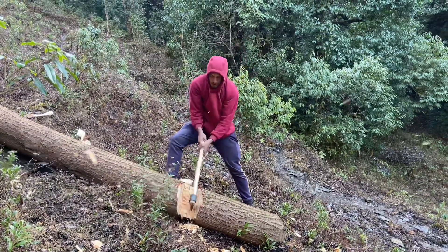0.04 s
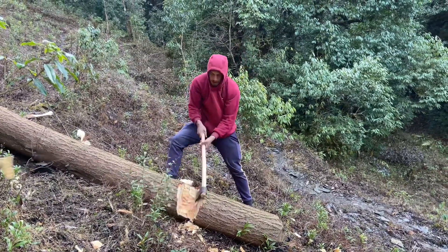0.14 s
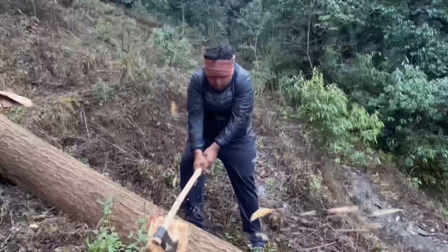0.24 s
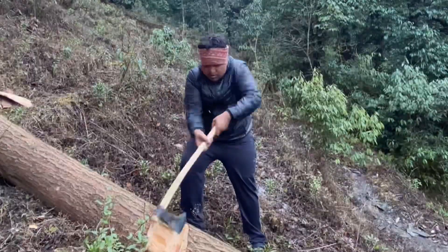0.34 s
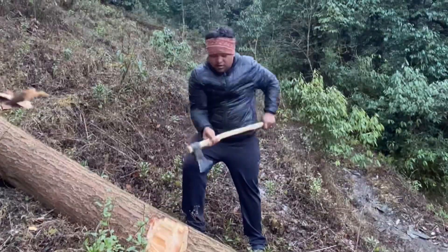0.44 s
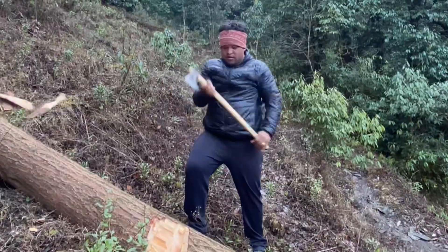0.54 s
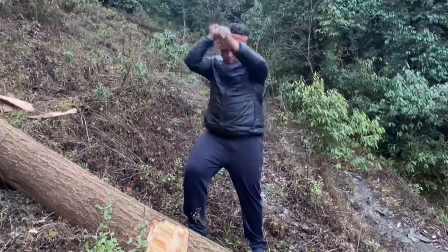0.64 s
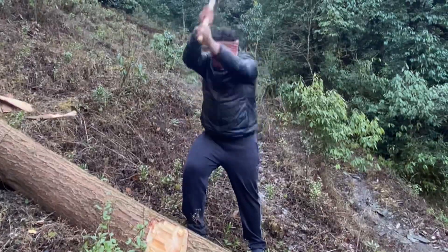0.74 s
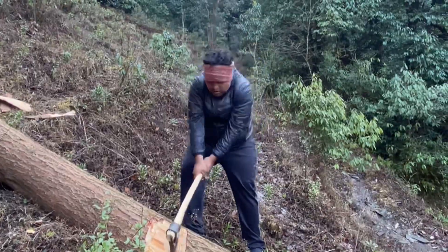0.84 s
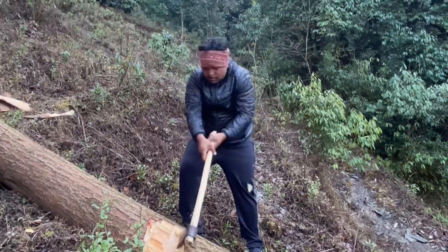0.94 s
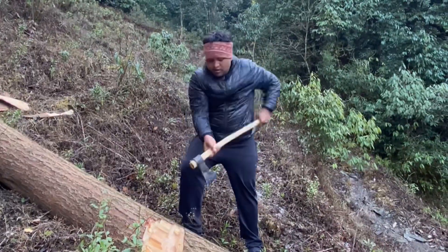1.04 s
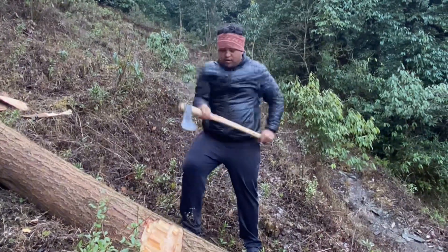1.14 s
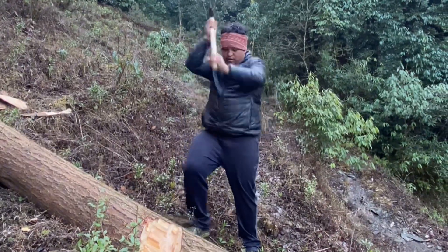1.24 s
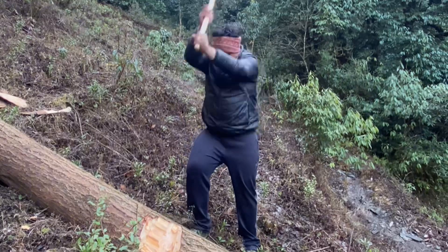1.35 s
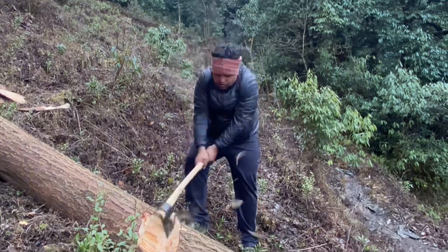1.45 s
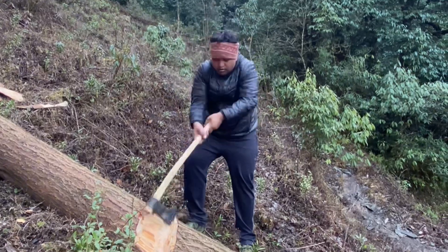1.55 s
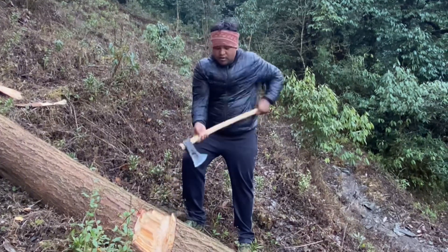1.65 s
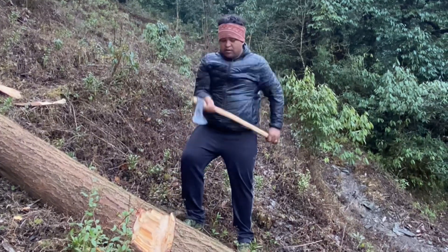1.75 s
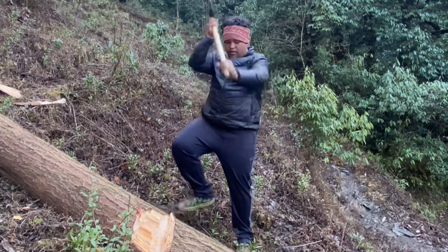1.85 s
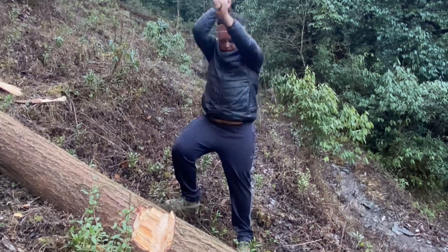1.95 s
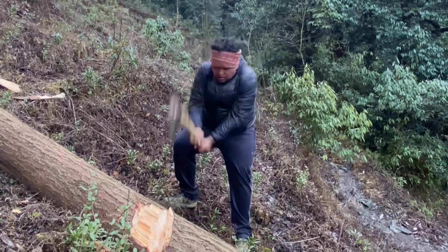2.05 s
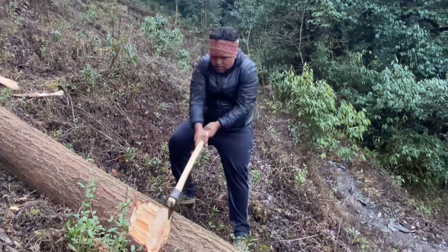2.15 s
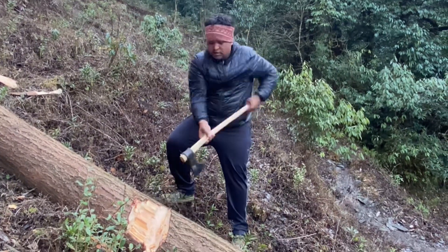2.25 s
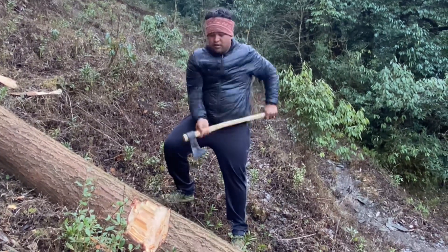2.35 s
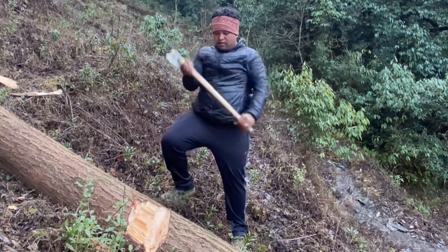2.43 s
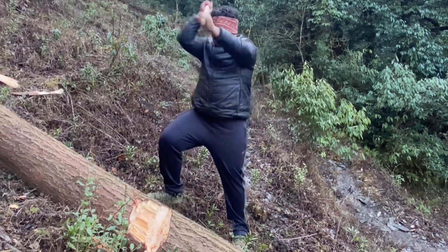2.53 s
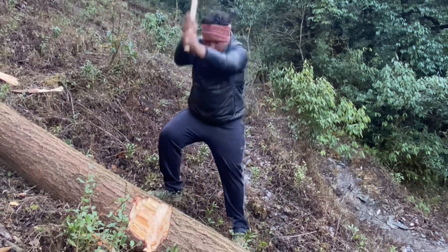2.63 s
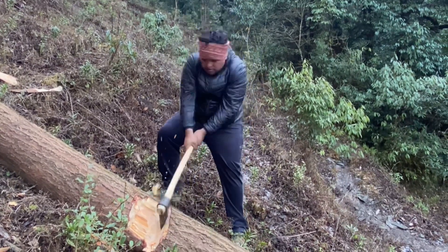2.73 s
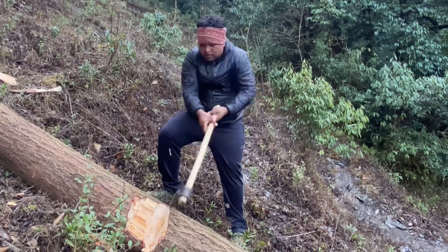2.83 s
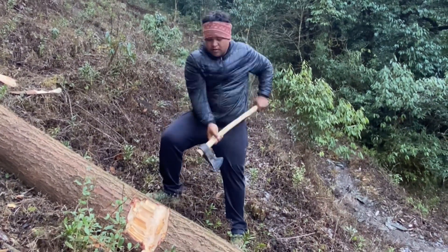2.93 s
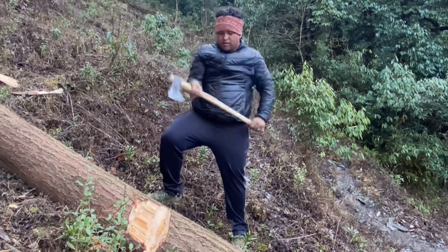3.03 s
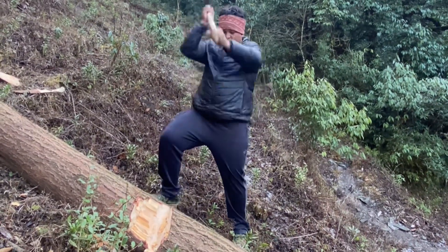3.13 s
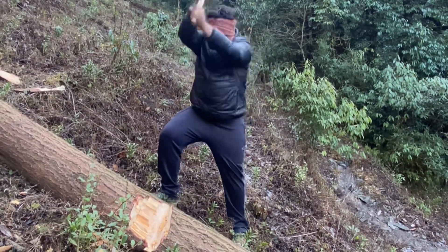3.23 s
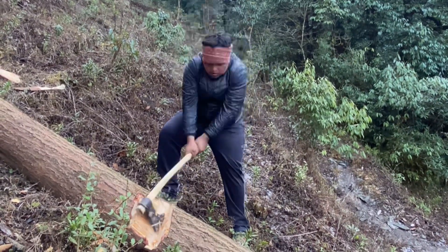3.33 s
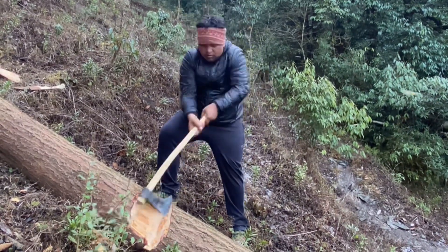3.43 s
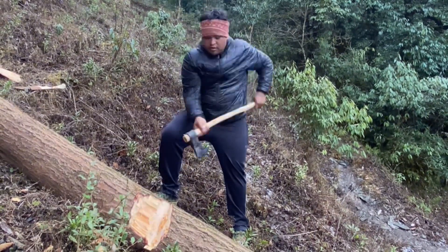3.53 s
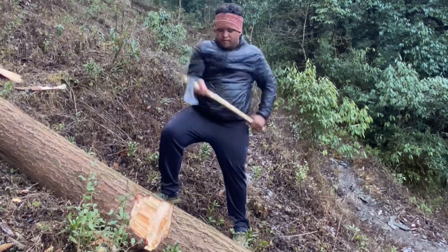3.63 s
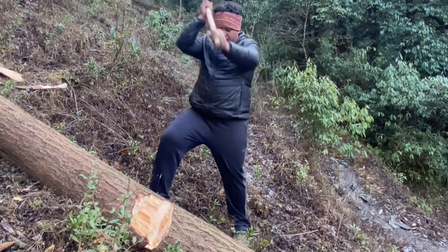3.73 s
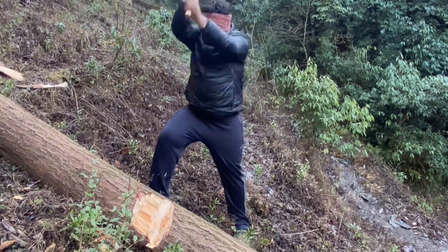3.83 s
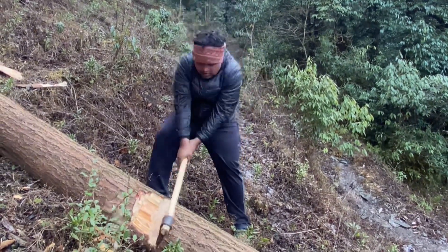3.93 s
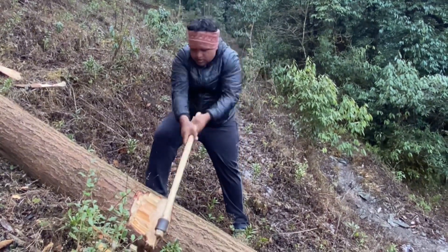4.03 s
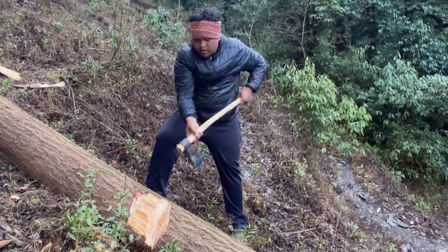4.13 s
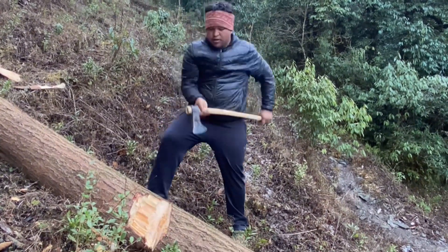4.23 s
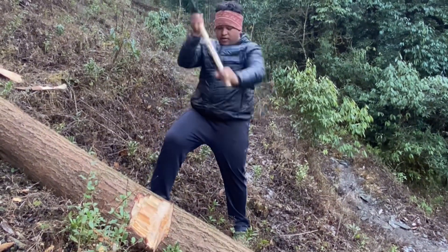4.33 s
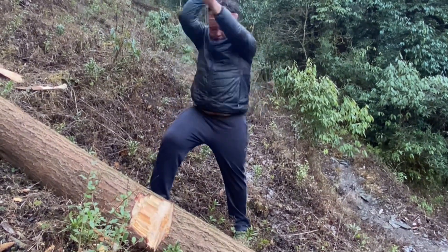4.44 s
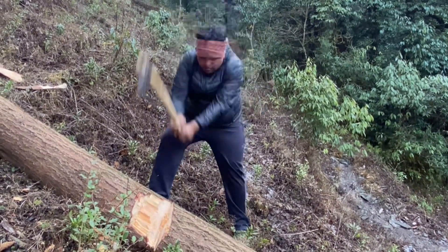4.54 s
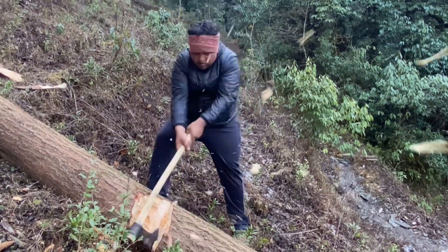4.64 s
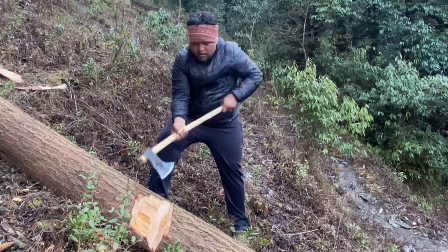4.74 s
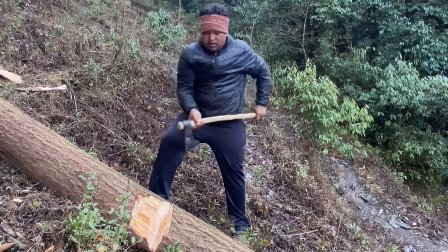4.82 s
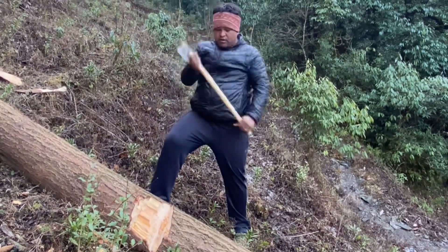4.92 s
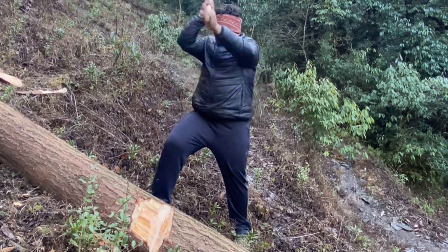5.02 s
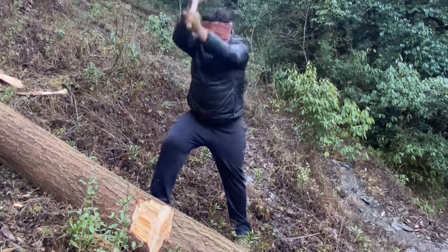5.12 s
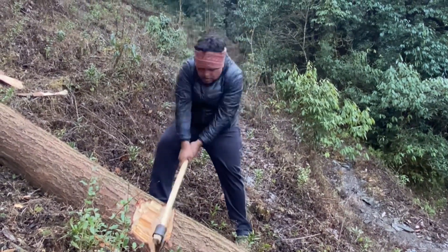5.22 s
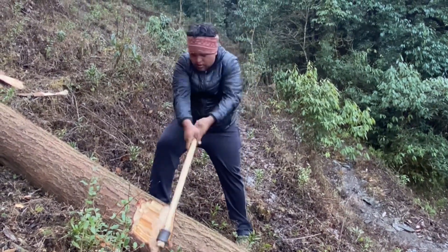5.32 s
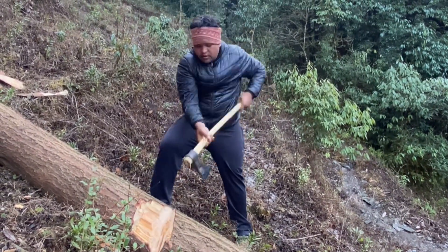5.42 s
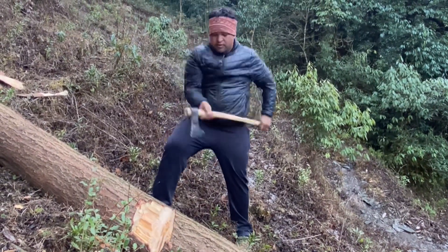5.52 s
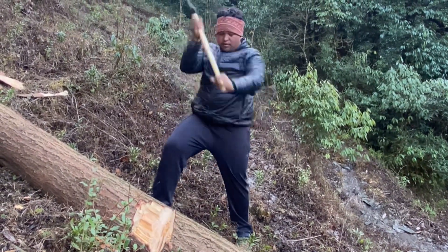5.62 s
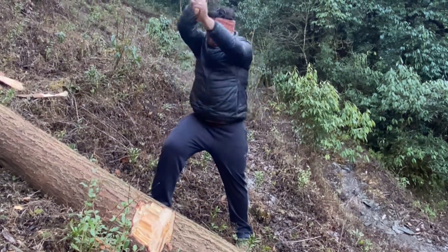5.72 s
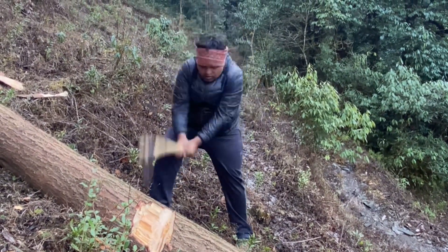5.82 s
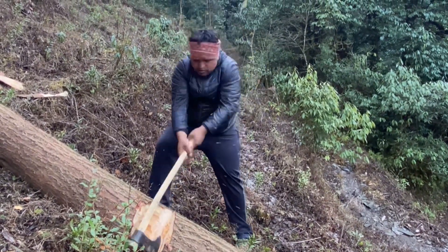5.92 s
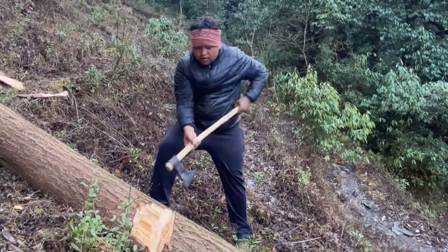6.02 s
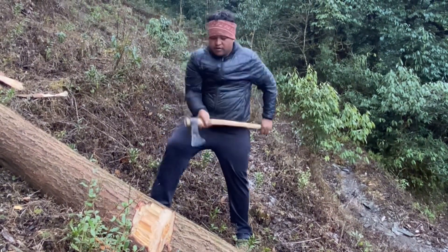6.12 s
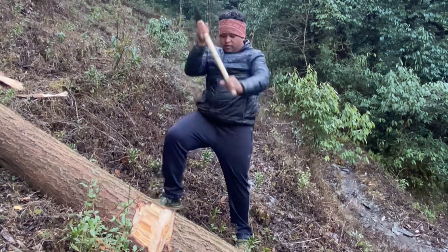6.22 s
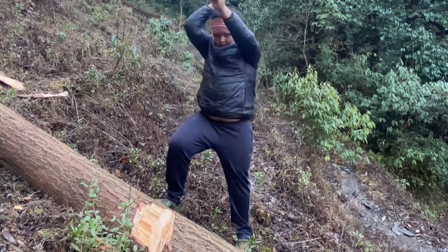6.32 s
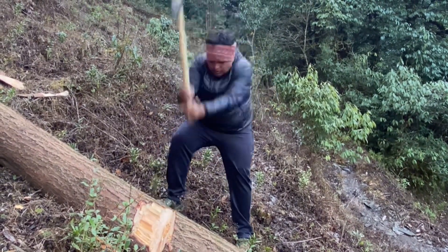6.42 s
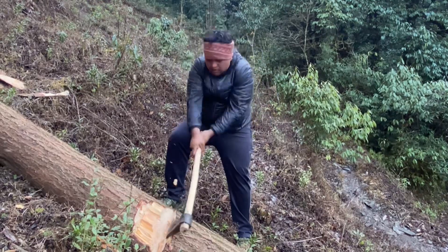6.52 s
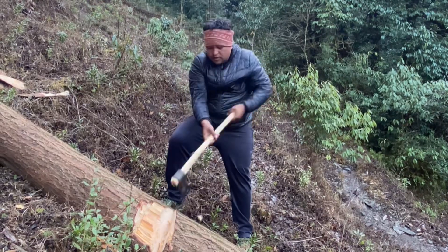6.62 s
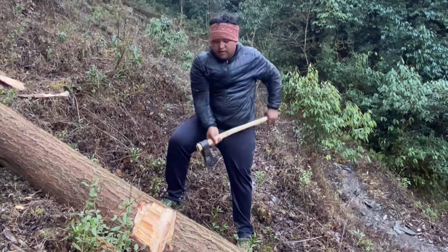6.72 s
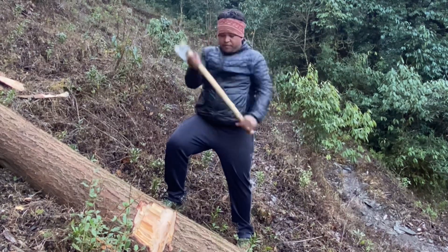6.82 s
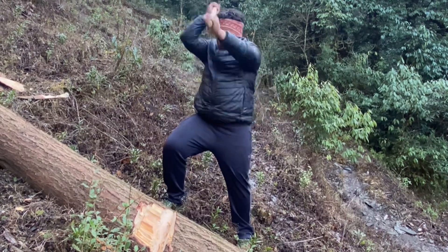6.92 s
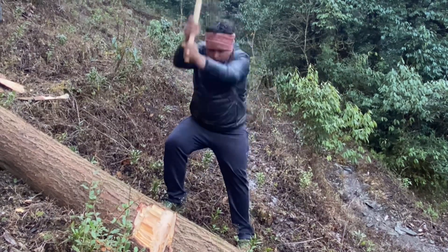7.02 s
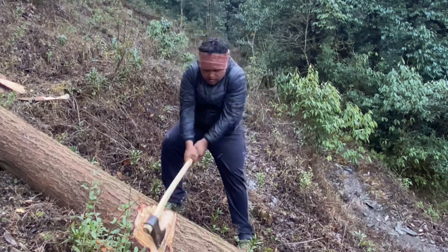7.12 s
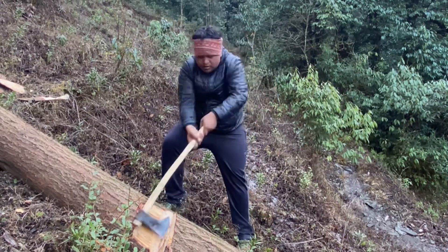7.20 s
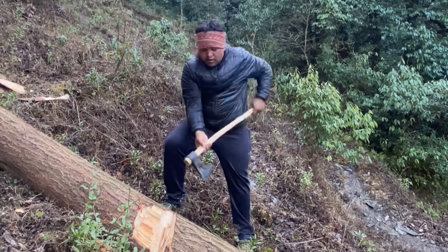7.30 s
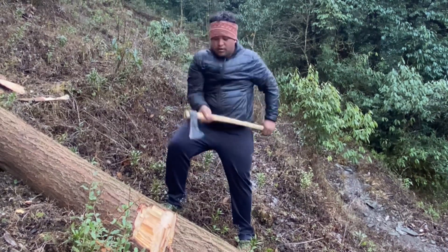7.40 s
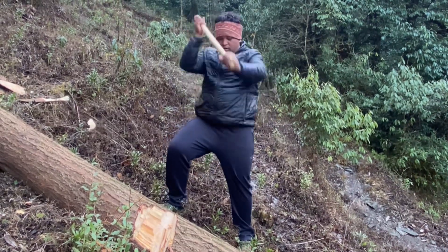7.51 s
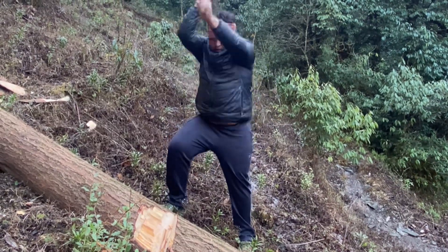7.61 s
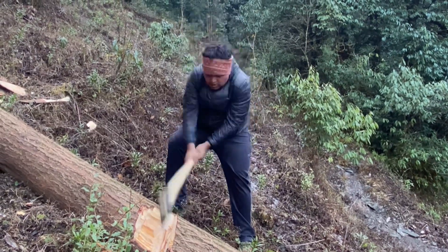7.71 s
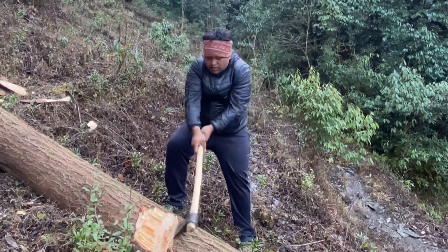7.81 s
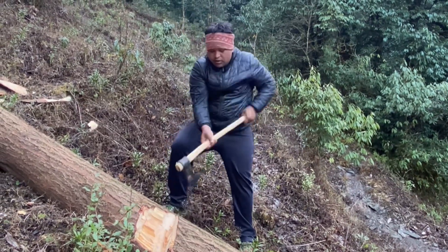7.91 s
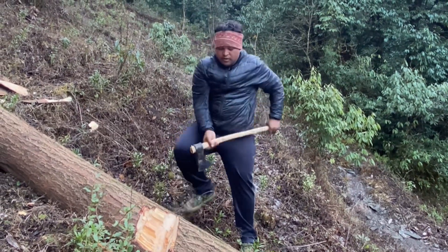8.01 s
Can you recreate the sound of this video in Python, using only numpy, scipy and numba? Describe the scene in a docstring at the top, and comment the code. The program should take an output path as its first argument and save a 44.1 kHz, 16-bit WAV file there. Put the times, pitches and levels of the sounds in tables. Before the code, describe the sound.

After a short low rumble breaks off, loud woody axe blows thump and splinter while sharper knocks on other timber fill the gaps.

```python
"""Axe work on a wooded slope

An axe chops a notch into a felled trunk while lighter, quicker blows fall on other timber.
Bursts of tiny fibre breaks ring the wood in each blow; then a damped thump and the log's hum follow.
Filtered noise makes the soft forest hiss, jacket swishes, crumbs and twig snaps; thuds reuse the thump.
A wavering rumble under hiss opens the scene and breaks off; a limiter lowers the loudest moments."""
import sys
import numpy as np
from scipy import signal
from scipy.fft import rfft, irfft, next_fast_len
from scipy.io import wavfile
from scipy.ndimage import uniform_filter1d, minimum_filter1d
from numba import njit

SR = 44100
rng = np.random.default_rng(int(sys.argv[2]) if len(sys.argv) > 2 else 0)


def int16_out(signal):
    """Quantize to a 16-bit WAV file."""
    q = np.round(np.clip(np.atleast_2d(signal).T, -1, 1) * 32767)
    wavfile.write(sys.argv[1], SR, q.astype(np.int16))


N = 355446
T = np.arange(N) / SR
SPAN = 19200  # samples in one short sound
AGE = np.arange(SPAN) / SR - .06  # seconds from its reference moment
PORT_LAG_S = .00057


def undb(db):
    """Turn decibels into gain."""
    return 10 ** (np.asarray(db) / 20)


def level(x, db, seconds):
    """Scale to the energy of a sound that holds db for that many seconds."""
    energy = np.mean(np.sum(x ** 2, axis=-1))
    return x * undb(db) * np.sqrt(seconds * SR / energy)


def colour(x, points):
    """Filter with a (pitch_hz, gain_db) curve, joined by straight lines over log frequency."""
    hz, db = np.transpose(points)
    n = next_fast_len(x.shape[-1])
    f = np.maximum(np.arange(n // 2 + 1) * SR / n, 1)
    gain = undb(np.interp(np.log(f), np.log(hz), db))
    return irfft(rfft(x, n) * gain, n)[..., :x.shape[-1]]


def ring(x, modes):
    """Drive (pitch_hz, width_hz, level_db) resonances, summed with alternating signs."""
    total = 0
    for k, (hz, width, db) in enumerate(modes):
        b, a = signal.iirpeak(hz, hz / width, SR)
        total = total + (-1) ** k * undb(db) * signal.lfilter(b, a, x)
    return total


def ports(pair, likeness):
    """The right port hears the left one's sound a little later, mixed with scattered sound of its own."""
    c = np.clip(likeness, 0, 1)
    late = np.roll(pair[0], int(PORT_LAG_S * SR))
    return np.array([pair[0], c * late + np.sqrt(1 - c * c) * pair[1]])


def add(out, x, s):
    """Mix in a short sound whose age zero falls at s seconds."""
    start = int((s + AGE[0]) * SR)
    a, b = max(start, 0), min(start + SPAN, N)
    out[:, a:b] += x[:, a - start:b - start]


def patchy(x, depth_db):
    """Let each region of the spectrum swell and sink on its own, a few dozen times a second."""
    z = signal.stft(x, nperseg=256)[2]
    walk = rng.standard_normal(z.shape[1:])
    walk = uniform_filter1d(walk, size=14, axis=0)  # neighbouring frequencies move together
    walk = uniform_filter1d(walk, size=11, axis=1)  # and so do neighbouring moments
    return signal.istft(z * undb(depth_db * walk / walk.std()))[1][:, :N]


def flicker(grain_db):
    """Noise whose level changes every millisecond, and whose colour changes more slowly."""
    steps = np.repeat(rng.standard_normal(N // 48 + 1), 48)[:N]
    grains = rng.standard_normal((2, N)) * undb(grain_db * steps)
    return patchy(grains, grain_db)


# shading of the right microphone port, strongest in the middle range, before its share is applied:
# (pitch_hz, gain_db)
PORT_SHADE = [(60, -2), (160, -1), (260, -1.5), (400, -5), (650, -5.5), (950, -6), (1350, -8), (1850, -3),
              (2400, 0), (16000, -0.5)]


def shade(x, share):
    """The shaded right port loses mostly middle range; share scales the curve in decibels."""
    return np.array([x[0], colour(x[1], [(hz, share * db) for hz, db in PORT_SHADE])])


# relative colour of the forest background: (pitch_hz, gain_db)
FOREST_COLOUR = [(25, -2), (110, 1.5), (190, 3), (300, 8.5), (450, 7.5), (900, 5.5), (1250, 8.5), (1650, 0),
                 (2500, 3), (3700, -1.5), (5400, 1), (8000, -6.5), (12000, -7), (15500, -25)]


def forest(db, sway_db):
    """Leaves and distant water: a soft hiss whose lows and highs sway apart."""
    knots = np.arange(0, 8.2, .11)
    sways = rng.standard_normal((2, len(knots)))
    sway_low, sway_high = (undb(sway_db * np.interp(T, knots, v)) for v in sways)
    hiss = level(colour(ports(flicker(grain_db=1.5), 0.08), FOREST_COLOUR), db, N / SR)
    low = colour(hiss, [(1000, 0), (4000, -30)])
    return low * sway_low + (hiss - low) * sway_high


# relative colour of the opening rumble and hiss: (pitch_hz, gain_db)
RUMBLE_COLOUR = [(20, -22), (45, -2), (90, 7.5), (160, 1.5), (230, 3.5), (380, -6), (650, -9.5),
                 (1500, -22), (6000, -27.5), (13000, -34), (16000, -42)]
# low tones humming in the rumble, relative to each other: (pitch_hz, waver_hz, level_db)
DRONE_TONES = [(68.6, 4.9, -9), (180.4, 1.7, -3.5), (318, 2.4, -13)]


def opening(db, drone_db, hiss_db, end_s, fade_db):
    """A low rumble with wavering tones dies away under a steady hiss, and all break off."""
    noise = level(colour(ports(flicker(grain_db=3), 0.16), RUMBLE_COLOUR), db, N / SR)
    low = colour(noise, [(500, -2.5), (1500, -9.0)])
    knots = np.arange(0, 8.2, .03)
    drone = np.zeros(N)
    for hz, waver, share in DRONE_TONES:
        pitch = hz + waver * np.interp(T, knots, rng.standard_normal(len(knots)))
        drone += undb(share) * np.sin(2 * np.pi * np.cumsum(pitch) / SR)
    hiss = (noise - low) * undb(hiss_db)
    rumble = (ports(low, 0.36) + undb(drone_db) * drone) * undb(-fade_db * T / end_s)
    return (hiss + rumble) * np.clip((end_s - T) / 0.0039, 0, 1)


# relative colour of rustling cloth and dry litter: (pitch_hz, gain_db)
RUSTLE_COLOUR = [(500, -48), (1500, 25.5), (4000, 26), (5500, 35.5), (8000, 26), (12000, 27.5), (16000, 9)]
# jacket and dry litter rustling: (middle_s, length_s, level_db)
SWISH_TIMES = [(0.58, 0.27, -48.5), (0.867, 0.076, -35.5), (1.302, 0.037, -40.5), (1.38, 0.16, -41),
               (1.627, 0.066, -39.5), (1.86, 0.14, -46), (2.058, 0.11, -55), (2.243, 0.0081, -41.5),
               (2.43, 1, -47), (6.78, 0.38, -44), (7.664, 0.053, -47), (8.05, 0.041, -37)]


def swishes():
    """Cloth and dry leaves rub: flickering noise under rounded swells."""
    out = np.zeros((2, N))
    rub = colour(flicker(grain_db=4), RUSTLE_COLOUR)
    for s, length, db in SWISH_TIMES:
        swell = np.exp(-((T - s) / length * 1.5) ** 2)
        out += level(rub * swell, db, length)
    return out


def crumbs():
    """About fifteen crumbs a second tick on the dry ground, most of them tiny, with shifting colours."""
    sizes = undb(np.minimum(4 * rng.exponential(size=N), 12))
    hits = (rng.random(N) < 15 / SR) * sizes
    decay = signal.lfilter([1], [1, -np.exp(-1 / (.002 * SR))], hits)  # 2 ms
    ticks = decay * rng.standard_normal((2, N))
    return level(patchy(colour(ticks, RUSTLE_COLOUR), 6), -55.5, N / SR)


# snapping twigs and falling chips, levels before the common trim: (start_s, level_db)
TWIG_SNAPS = [(0.085, -30.5), (0.549, -37.5), (0.68, -37.5), (0.8982, -28), (1.424, -31.5), (1.4505, -40),
              (1.934, -37), (2.38, -38.5), (3.808, -35), (4.187, -39), (6.9536, -32.5), (8.0534, -27.5)]


def twigs():
    """Single sharp snaps: noise that starts at once and dies within milliseconds."""
    out = np.zeros((2, N))
    for s, db in TWIG_SNAPS:
        snap = rng.standard_normal((2, SPAN)) * (AGE > 0) * np.exp(-abs(AGE) / .0022)
        add(out, level(colour(ports(snap, 0.13), RUSTLE_COLOUR), db - 1.0, 0.012), s)
    return out


def thump(hz, decay_s, rise_s=0.0025, rough=1.0, sag=.6):
    """A shove on the log: a few heavily damped low cycles that sink in pitch as the push slackens."""
    t = np.maximum(AGE + 2 * rise_s, 0)  # begins two rise times early
    pitch = hz * (1 + sag * np.exp(-t / 0.0052))
    swing = np.sin(2 * np.pi * (np.cumsum(pitch) / SR + rng.random()))
    grit = level(ring(rng.standard_normal((2, SPAN)), [(hz, hz * 0.51, 0)]), 0, SPAN / SR)
    envelope = (1 - np.exp(-(t / rise_s) ** 2)) * np.exp(-t / decay_s)
    shove = (rough * grit + swing) * envelope
    return ports(colour(shove, [(30, -7.5), (110, 2.5), (500, 4), (1200, -9.0)]), 0.99)


# the log rocking back and wood settling on the ground: (time_s, level_db)
SETTLING_THUDS = [(0.616,-35), (0.978,-23.5), (1.02,-27.5), (1.562,-16), (2.867,-31.5), (2.909,-34),
                  (3.462,-17), (3.485,-16), (5.966,-14), (6.643,-24), (7.726,-23.5), (7.849,-15)]


def thuds():
    """Soft thuds of settling wood: smoother thumps at one low pitch."""
    out = np.zeros((2, N))
    for s, db in SETTLING_THUDS:
        add(out, level(thump(hz=169.4, decay_s=0.015, rise_s=0.0022, rough=0.37), db, 0.015), s)
    return out


def slope_echo(x, wet_db, t60_s):
    """Trunks and ground scatter a thin, dull echo: the sound is convolved with decaying noise."""
    t = np.arange(SR) / SR
    echo = rng.standard_normal((2, SR)) * undb(-60 * t / t60_s) * (1 - np.exp(-t / 0.0055))
    echo = colour(echo, [(60, 7.5), (200, -24), (500, -2.5), (1000, -8), (2600, -4), (12000, -24)])
    return signal.fftconvolve(x, level(echo, wet_db, 1 / SR), axes=1)[:, :N]


SWELL_SHAPE = 1.785  # 1 is a pointed swell, 2 a rounded one
RELIEF_S = 0.47  # a crack of 0 dB lets the crunch die in this time, a stronger one sooner
CLICK_DB = 12.5  # a crack packs its energy into one instant
# the split runs on in jerks after the first click: (usual_delay_s, level_db)
LATER_CRACKS = [(.003, -6), (.0075, -13)]


def fractures(length, grain_db, likeness, crack_s, crack_db, fall):
    """Fibre breaks swell and fade (sooner for a small fall); sharp clicks at crack_s relieve them."""
    spread = length / 2 * np.where(AGE < 0, 1, fall)
    swell = np.exp(-abs(AGE / spread) ** SWELL_SHAPE)
    since_crack = np.maximum(AGE - crack_s - .005, 0)
    relief = np.exp(-since_crack * undb(crack_db) ** 2 / RELIEF_S)
    sizes = undb(grain_db * np.repeat(rng.standard_normal(SPAN // 32), 32))
    force = swell * relief * sizes * rng.standard_normal((2, SPAN))
    for delay, db in [(0.00019, 0)] + list(LATER_CRACKS):
        at = np.searchsorted(AGE, crack_s + delay * rng.uniform(.7, 1.3))
        force[:, at] += undb(CLICK_DB + crack_db + db) * rng.choice([-1, 1], 2)
    return ports(force, likeness)


BITE_OCT_PER_DB = 0.4  # a clean bite (many splinters, little shove) rings the wood higher
FAVOUR_DB_PER_OCT = 4.5  # modes away from the bite's pitch are weaker


def bitten_modes(wood, bite_hz, clean_db):
    """The bite favours modes near one pitch; the place of the cut detunes them and shifts their levels."""
    centre_hz = bite_hz * 2 ** (BITE_OCT_PER_DB * clean_db)
    modes = []
    for hz, width, db in wood:
        detune, shift = rng.standard_normal(2)
        favour_db = -FAVOUR_DB_PER_OCT * abs(np.log2(hz / centre_hz))
        modes.append((hz * (1 + .006 * detune), width, db + 2 * shift + favour_db))
    return modes


SLIVER_DB, SLIVER_Q = 7, 38  # slivers ring out of the hiss; Q is pitch over width
# relative colour of splintering fibres: (pitch_hz, gain_db)
SPLINTER_COLOUR = [(1400, -19), (2300, 4.5), (3200, 6.5), (4200, 2), (5400, 6.5), (6500, -4), (8000, -7),
                   (11000, -6.5), (16000, -28)]


def splinter_hiss(fibres, dull_db):
    """Fine fibre breaks hiss, and a few torn slivers each ring at a random pitch."""
    pitches = np.exp(rng.uniform(np.log(2000), np.log(9000), size=14))
    slivers = ring(fibres, [(hz, hz / SLIVER_Q, SLIVER_DB) for hz in pitches])
    return colour(colour(fibres + slivers, SPLINTER_COLOUR), [(5000, 0), (12000, -dull_db)])


HUM_SAG_PER_S = 0.33  # the hum sinks by this share of its pitch each second


def humming(modes):
    """The log's long modes take up the push by random shares; they sag in pitch and waver irregularly."""
    t = np.maximum(AGE, 0)
    knots = np.arange(0, .6, .014)
    out = np.zeros((2, SPAN))
    for hz, width, db in modes:
        share, detune = rng.standard_normal(2)
        swell, slip = (np.interp(t, knots, v) for v in rng.standard_normal((2, len(knots))))
        phase = rng.random() + .08 * (rng.standard_normal((2, 1)) + slip)
        size = undb(db + 3 * share + 3.5 * swell)
        cycles = hz * (1 + 0.012 * detune - HUM_SAG_PER_S * t / 2) * t
        out += size * np.exp(-np.pi * width * t) * np.sin(2 * np.pi * (cycles + phase))
    return out * (1 - np.exp(-(t / 0.0081) ** 2))


CHIP_Q = 13.4  # pitch over width: small, high chips ring more briefly
CRACK_SOFT_DB = 8.5  # the crack is woody: it stands out less in the hiss of the fine fibres
HUM_DB_PER_DB, USUAL_THUMP_DB = 1.23, -15  # the hum grows with the thump, from this table level


def blows(table, wood, hum, length_s, fall, stop_s, bite_hz, crunch_db, splinter_db, body_db,
          thump_db, hum_db, grain_db, dull_db, decay_s, likeness):
    """Fractures ring wood and chip and hiss; stop_s after the crack the log thumps and hums."""
    out = np.zeros((2, N))
    for s, crunch, splinter, shove, chip_hz, thump_hz, chip_db, crack_s, crack_db in table:
        force = fractures(length_s, grain_db, likeness, crack_s, crack_db, fall)
        modes = bitten_modes(wood, bite_hz, splinter - shove)
        knock = level(ring(force, modes), crunch + crunch_db, length_s)
        # the piece being split off rings with its own note, higher the smaller it is
        tear = fractures(length_s, grain_db, likeness, crack_s, crack_db, fall)
        chip_mode = [(chip_hz, chip_hz / CHIP_Q, 0)]
        chip = np.array([level(ring(side, chip_mode), chip_db, length_s) for side in tear])
        add(out, knock + chip, s)
        fibres = fractures(length_s, grain_db, likeness, crack_s, crack_db - CRACK_SOFT_DB, fall)
        add(out, level(splinter_hiss(fibres, dull_db), splinter + splinter_db, length_s), s)
        # the whole log already gives during the crunch
        body = ring(ports(force, 0.55), [(thump_hz, thump_hz, 0)])
        body = ring(body, [(thump_hz, 2 * thump_hz, 0)])
        add(out, level(body, shove + body_db, length_s), s + stop_s / 2)
        thump_s = s + crack_s + stop_s
        add(out, level(thump(thump_hz, decay_s), shove + thump_db, 0.026), thump_s)
        log_hum_db = hum_db + HUM_DB_PER_DB * (shove - USUAL_THUMP_DB)
        add(out, level(humming(hum), log_hum_db, 0.08), thump_s)
    return out


# usual wood modes under the lighter blows: (pitch_hz, width_hz, level_db)
TIMBER_MODES = [(490.4,41,-0.5), (695,145,-1.5), (946,73,3), (1047,114,2.5), (1269,110,5.5), (1437,180,1),
                (1844,167,1), (2280,183,-4.5), (2870,430,-14.5)]
# usual bending modes of the lighter timber: (pitch_hz, width_hz, level_db)
TIMBER_BENDING = [(123, 9.5, -16), (188, 14.4, -3.5), (216.3, 16.6, -1), (266.3, 15.8, -2), (395, 19.2, -9)]
# lighter blows on other timber; crunch, splinter and thump levels are before the trims in lighter_blows:
# (crunch_middle_s, crunch_db, splinter_db, thump_db, chip_hz, thump_hz, chip_db,
#  crack_delay_s, crack_over_crunch_db)
LIGHT_BLOWS = [(.461,-16,-28,-13.5,2220,269.4,-20.5,-0.0013,15),
               (.499,-16,-19,-25.5,1110,177,-24.5,0.00061,13.6),
               (2.4,-24,-52,-23.5,1075,326,-36.5,-.0003,15),
               (2.619,-17,-32,-23,1360,345,-21.5,-0.0032,14.5),
               (2.827,-23,-39,-23.5,1065,215.7,-35,-0.0051,7.9),
               (3.044,-18,-25.5,-19.5,1263,263.7,-12,-0.0016,16.8),
               (3.27,-15,-27.5,-17,1050,240.2,-17.5,0.0017,9.4),
               (3.353,-38,-31.5,-20,500,200,-41,-0.0037,13),
               (3.529,-24.5,-27,-21,1330,253.5,-22.5,0.00034,5),
               (3.556,-35,-39,-13.5,510,248.4,-14.5,-0.0054,12),
               (3.759,-21.5,-29.5,-19.5,1260,277.3,-18,-0.0015,13),
               (3.866,-30,-32.5,-18.5,2300,310.2,-28.5,-0.0012,16),
               (3.993,-12,-28,-23,1900,305,-16,-0.0029,10.4),
               (4.067,-29.5,-43,-16,506,201.8,-20,-0.0037,8.3),
               (4.229,-10.5,-28.5,-26,1230,294.4,-12,-0.00086,12),
               (4.266,-27,-37,-11,503,270,-13.5,-0.0052,9.6),
               (4.467,-15,-29,-18,1200,310.8,-22,-0.00071,17.4),
               (4.718,-19,-27,-20.5,1260,203.5,-26,-0.00072,17),
               (4.891,-17,-23,-16,480,258.4,-28,0.00037,17.5),
               (4.974,-17,-28,-24,1230,232.2,-19.5,-0.002,12.3),
               (5.483,-24.5,-27,-20.5,935,267.4,-25,-0.0044,3.7),
               (5.515,-23,-22.5,-21,473,307.7,-22,-0.0048,12),
               (5.712,-23,-24.5,-17.5,935,310,-21,-0.0015,14.6),
               (5.749,-17.5,-25,-21,1480,261.3,-19.5,-0.0025,19.6), (6.044,-23,-27.5,-19,1070,229,-27,0,10),
               (6.142,-32,-29.5,-16,930,244.3,-21,-0.003,3.2),
               (6.302,-15,-25,-22.5,1580,273.4,-25,-0.00044,13.6),
               (6.364,-19.5,-28,-15,953,251.3,-18.5,-0.0052,9),
               (6.797,-6.5,-21.5,-13,1959,239.7,-19.5,-.001,7.7),
               (7.016,-21,-22,-17.5,2870,289,-24.5,-0.0042,6.9),
               (7.065,-9.5,-20.5,-13.5,984,217.5,-26,-0.0021,14),
               (7.239,-21,-34,-14.5,810,268,-18.5,-0.0037,14),
               (7.403,-18.5,-21.5,-16.5,1740,243.6,-29,-.0024,7),
               (7.457,-17,-24.5,-8.5,475,244.7,-19,-0.00014,4.3),
               (7.695,-16.5,-26.5,-20,497,282.4,-25,-0.00028,14),
               (7.928,-18,-33,-14.5,890,255.3,-19,-0.00075,11.6)]


def lighter_blows():
    """Quick blows on lighter timber, with a duller splinter hiss and a longer thump than the axe's."""
    return blows(LIGHT_BLOWS, TIMBER_MODES, TIMBER_BENDING, length_s=0.026, fall=0.84, stop_s=.003,
                 bite_hz=3160, crunch_db=0.5, splinter_db=-2.5, body_db=-2.5, thump_db=2.0,
                 hum_db=-24.0, grain_db=3.0, dull_db=3.5, decay_s=0.012, likeness=0.14)


# usual wood modes around the axe's notch: (pitch_hz, width_hz, level_db)
NOTCH_MODES = [(398.5,36,1.5), (627,66,-0.5), (933,66,3), (1230,104,1.5), (1342,143,1), (1840,410,-9),
               (2084,190,-5), (2600,150,-8.5), (2970,140,-14.5)]
# usual bending modes of the trunk: (pitch_hz, width_hz, level_db)
TRUNK_BENDING = [(67, 7, -17.5), (129.7, 9.3, 3.5), (163, 10.1, 12), (191.2, 7.1, 1), (222, 12.1, 8),
                 (264, 5.4, -5.5), (305.5, 9.1, -0.5), (378, 7, -6.5)]
# heavy axe blows, and at .947 s a small knock of a breaking chip;
# crunch, splinter and thump levels are before the trims in axe_blows:
# (crunch_middle_s, crunch_db, splinter_db, thump_db, chip_hz, thump_hz, chip_db,
#  crack_delay_s, crack_over_crunch_db)
AXE_CHOPS = [(.295,-21.5,-18.5,-15,940,191.2,-4.5,0.0026,6), (.92,-14,-27,-13.5,2155,248.4,-13.5,0.002,20),
             (.947,-33,-45,-15,1770,184.3,-29,-0.0019,21), (1.513,-18.5,-21,-16,1370,226,-15,-0.0038,8.5),
             (2.144,-19,-20.5,-14.5,1280,337.4,-14.5,-0.0017,12.5),
             (2.772,-15.5,-17,-18,2480,244.5,-25,-0.0033,14), (3.417,-10.5,-26,-10,997,213.5,-14,-.003,2),
             (4.029,-15,-26,-15,890,298,-19.5,0.00087,22.5), (4.658,-13,-18,-12.5,950,248.5,-15,-0.00062,1),
             (5.266,-20.5,-30.5,-20,2220,260.3,-26,-0.0059,4),
             (5.294,-19.5,-21.5,-17,930,253.3,-11,-.0028,18),
             (5.927,-13,-20,-9.5,1356,234.9,-16,-0.0012,13),
             (6.543,-10.5,-24.5,-8.5,1210,293.7,-10,0.0014,12.5),
             (7.179,-21.5,-23.5,-20,3250,148.6,-37,-.005,11.5),
             (7.802,-12.5,-27,-7.5,925,247.5,-13,0.000099,22)]


def axe_blows():
    """The axe bites into the trunk's notch, a chip knocks once, and the log is left humming."""
    return blows(AXE_CHOPS, NOTCH_MODES, TRUNK_BENDING, length_s=0.023, fall=1.01, stop_s=0.005535,
                 bite_hz=2100, crunch_db=9.5, splinter_db=5, body_db=2.5, thump_db=3.5,
                 hum_db=-18.5, grain_db=2.5, dull_db=-3.5, decay_s=0.0089, likeness=0.15)


def scene():
    """Both kinds of blow with their echo, over the sounds of the slope and the opening rumble."""
    wood = axe_blows() + lighter_blows()
    litter = swishes() + crumbs() + twigs() + thuds()
    around = slope_echo(wood, wet_db=-30.5, t60_s=0.32) + litter + forest(db=-46.0, sway_db=4.0)
    start = opening(db=-17.5, drone_db=-11, hiss_db=0.5, end_s=0.265, fade_db=21.0)
    return shade(wood, 1.42) + shade(around, 0.66) + start


@njit
def hold(peaks, release):
    """Follow peaks at once and let go slowly."""
    out, e = np.empty(len(peaks)), 0.
    for i in range(len(peaks)):
        e = max(peaks[i], e * release)
        out[i] = e
    return out


LIMIT, RELEASE_S = 1.254, .13  # limiter threshold, as a multiple of full scale
TOP_HZ = 15900


def record(dry):
    """A look-ahead limiter lowers loud moments, full scale clips what is left, and the top is cut."""
    peaks = hold(abs(dry).max(axis=0), np.exp(-1 / (RELEASE_S * SR)))
    gain = np.minimum(1, LIMIT / (peaks + 1e-9))
    gain = uniform_filter1d(minimum_filter1d(gain, size=160), size=160)
    clipped = np.clip(dry * gain, -1, 1)
    top_cut = signal.ellip(8, .2, 70, TOP_HZ, fs=SR, output="sos")
    return signal.sosfilt(top_cut, clipped)


dry = scene()
out = record(dry)
int16_out(out)
```